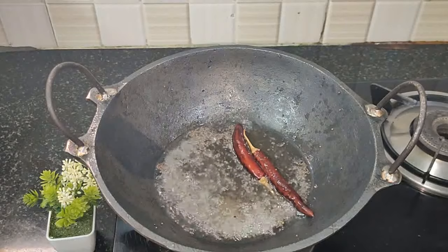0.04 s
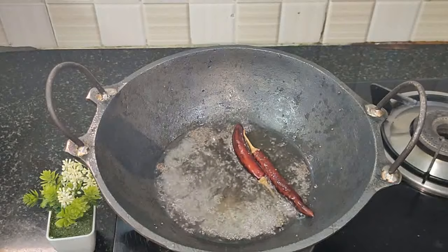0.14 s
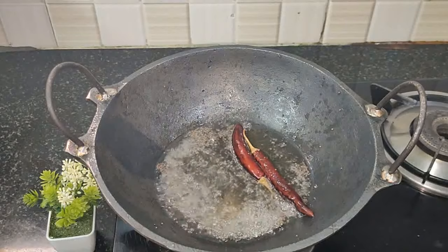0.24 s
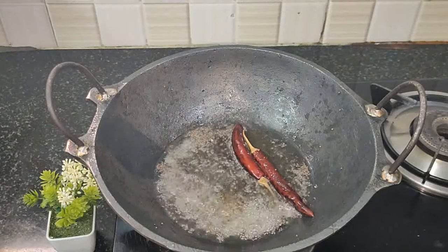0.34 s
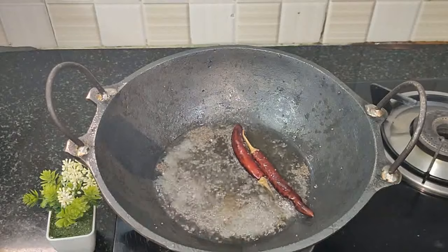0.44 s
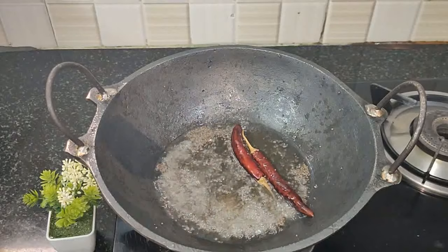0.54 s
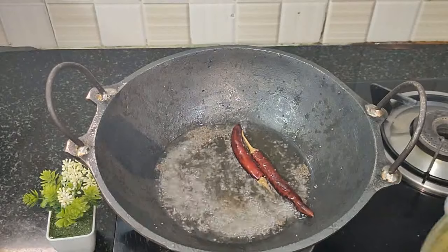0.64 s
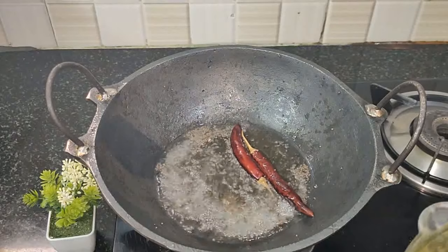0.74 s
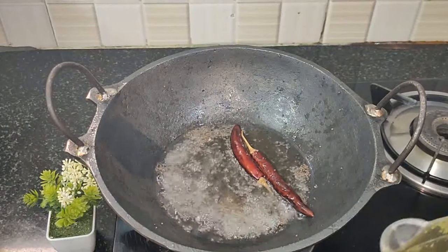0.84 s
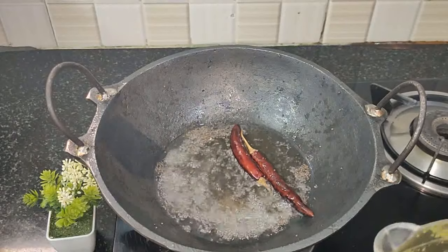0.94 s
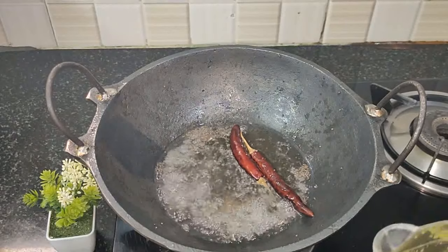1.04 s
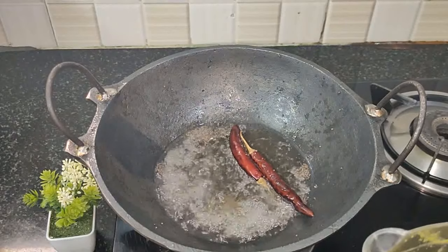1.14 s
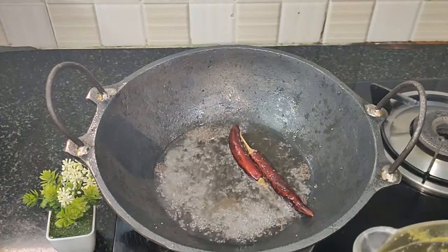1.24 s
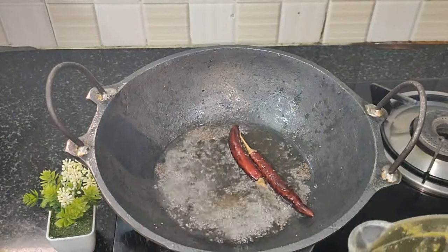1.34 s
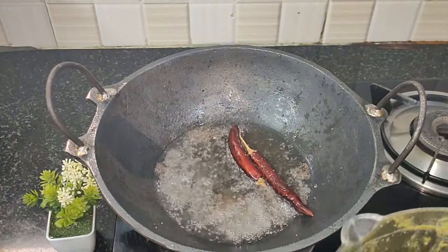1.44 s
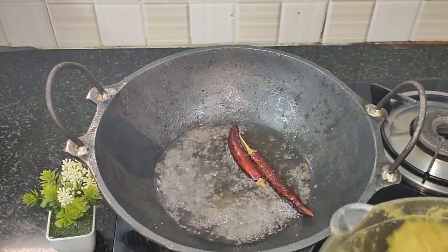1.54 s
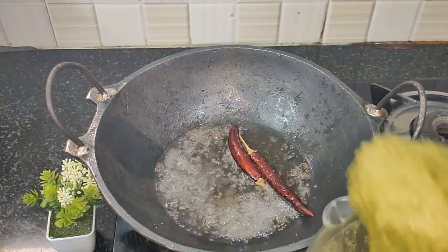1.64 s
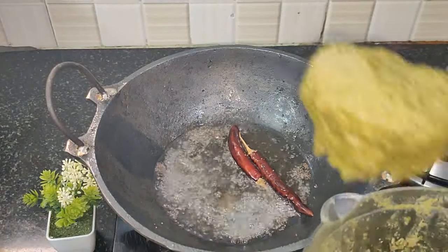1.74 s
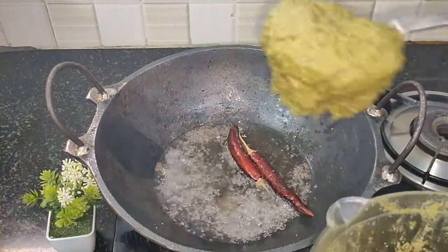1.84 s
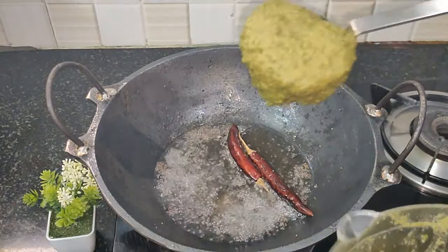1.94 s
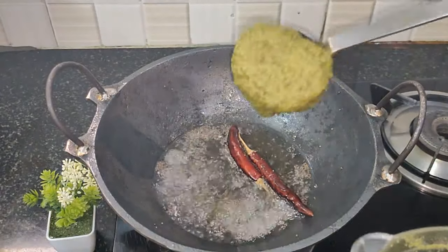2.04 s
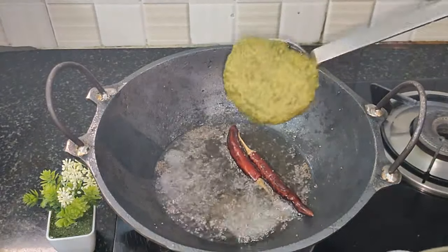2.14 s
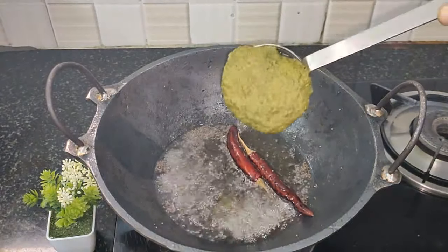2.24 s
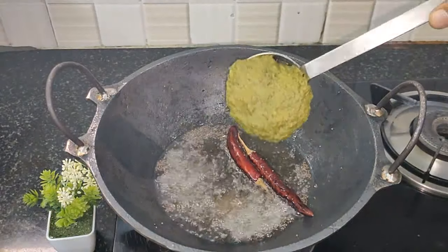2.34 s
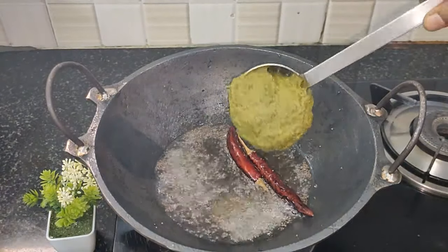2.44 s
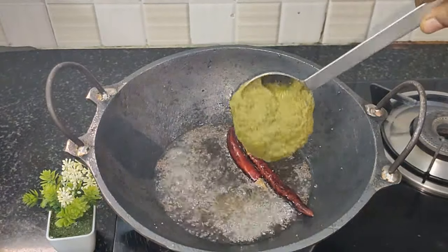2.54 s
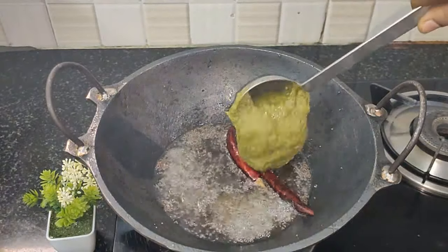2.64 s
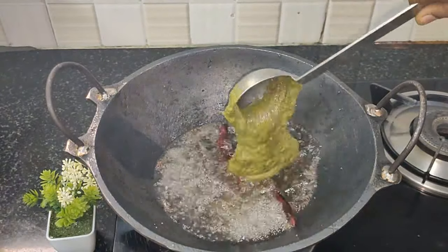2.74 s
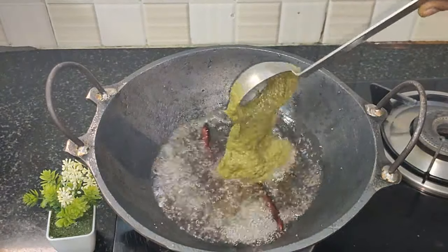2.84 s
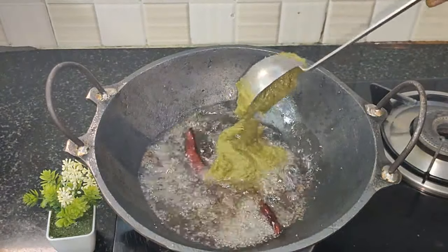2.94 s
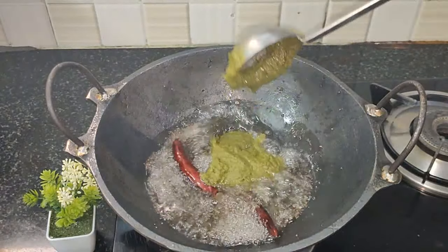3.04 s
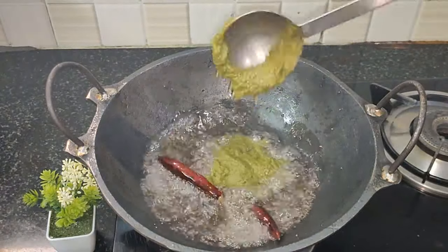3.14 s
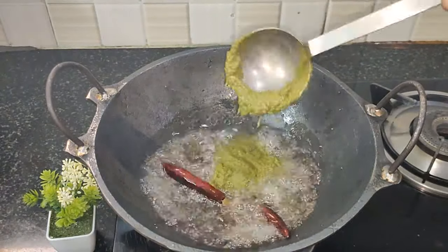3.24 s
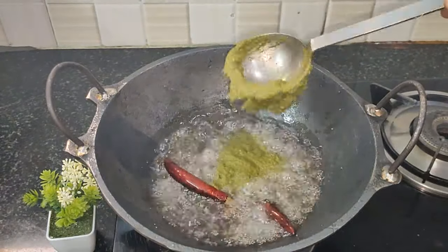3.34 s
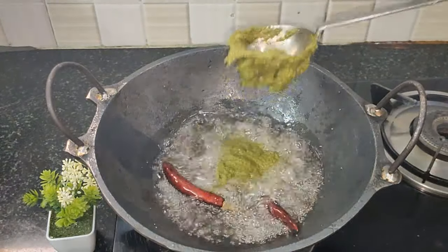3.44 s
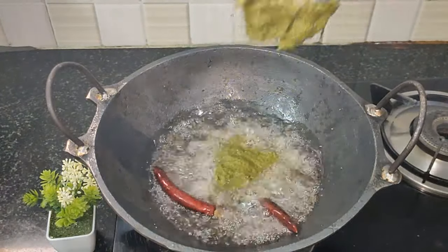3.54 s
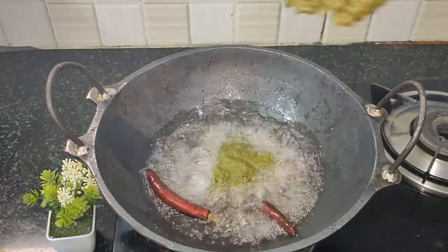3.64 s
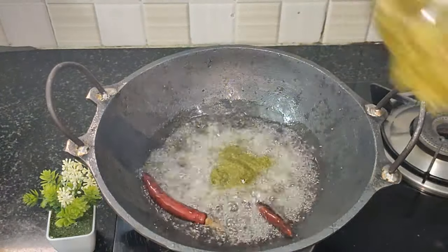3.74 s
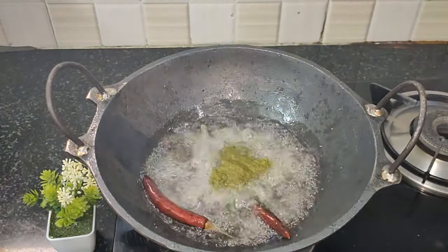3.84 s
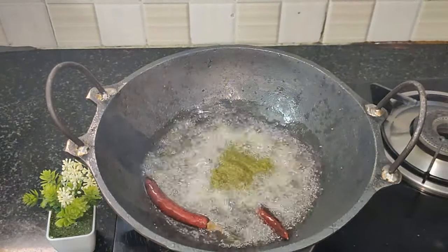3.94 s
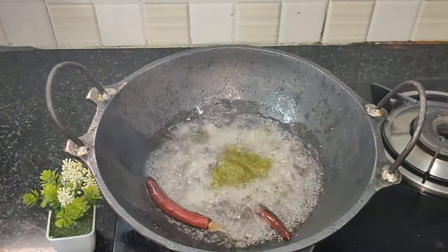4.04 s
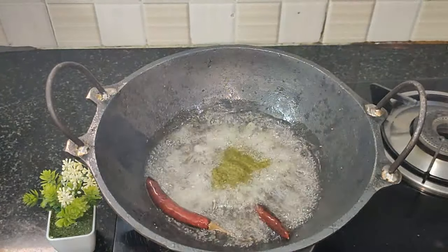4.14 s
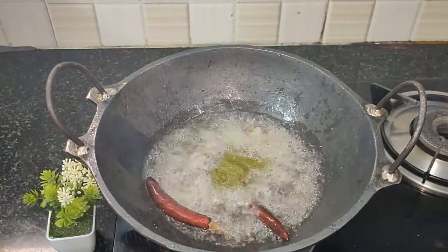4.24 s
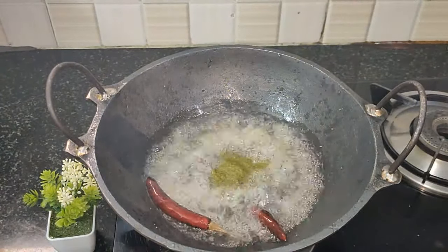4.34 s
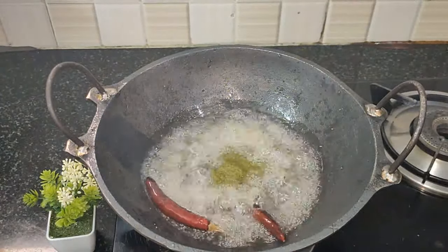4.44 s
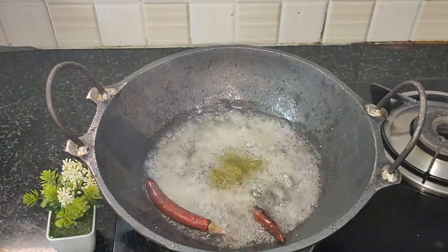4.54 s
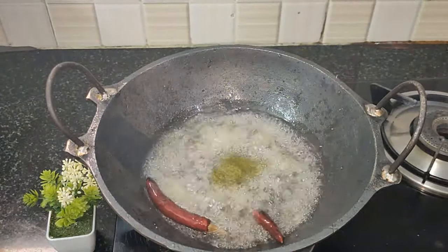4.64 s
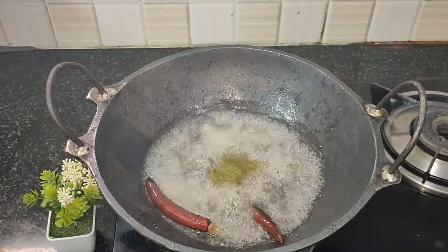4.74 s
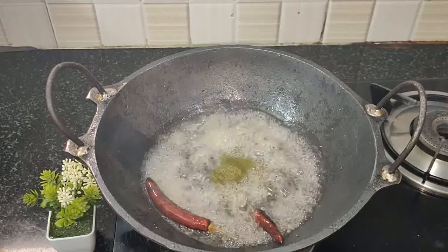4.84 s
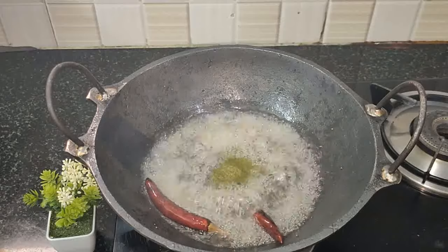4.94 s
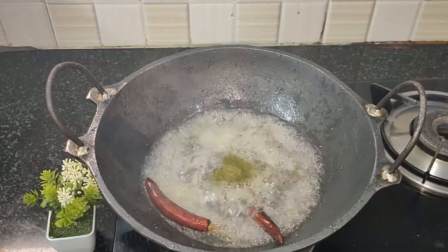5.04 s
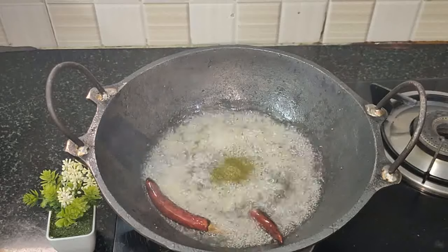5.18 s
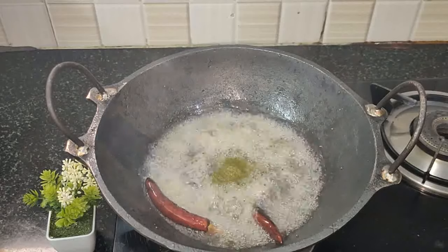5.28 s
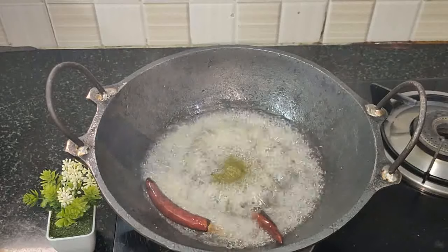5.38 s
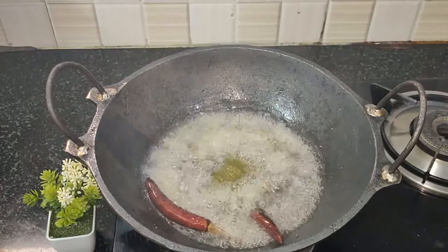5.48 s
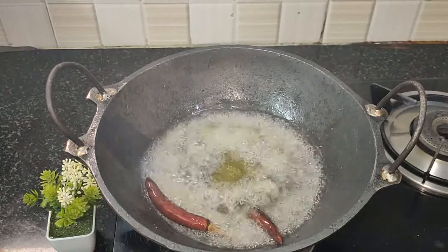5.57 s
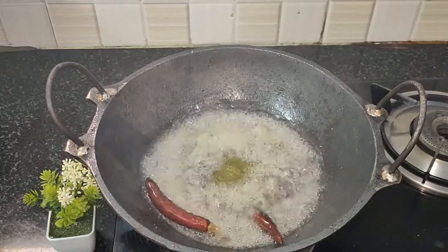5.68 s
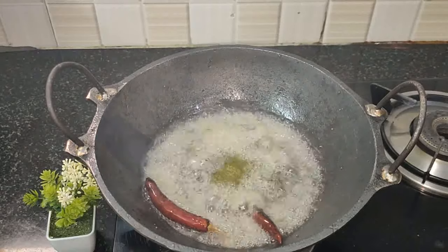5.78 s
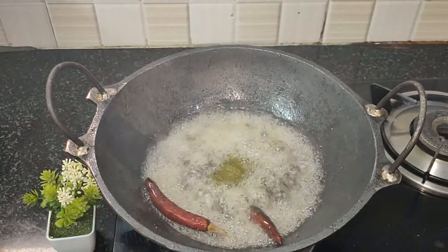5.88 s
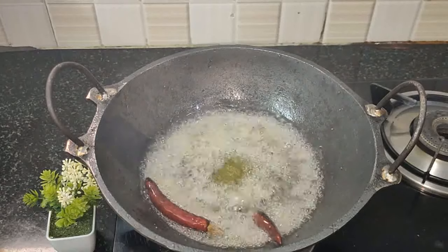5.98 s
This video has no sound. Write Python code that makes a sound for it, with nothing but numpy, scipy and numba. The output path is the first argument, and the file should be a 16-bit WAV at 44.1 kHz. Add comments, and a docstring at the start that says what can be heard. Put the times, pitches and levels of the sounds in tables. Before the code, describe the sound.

Spitting, snapping oil in an iron pan with faint knocks on the counter, then a rush of bubbling frying that grows and holds.

```python
"""Mustard seeds and wet paste in hot oil

Seeds crackle and pop in an iron pan in a small tiled kitchen; a vessel slides and knocks on the counter.
A ladle of wet paste drops into the oil, gurgles and swells into a loud, steady sizzle; a motor hums faintly.
Bubbles, pops and droplets are dying sines, coloured by the pan; the vessel is a set of struck modes;
the hum is wavering sines over filtered noise. Dense random echoes make the room."""
import sys
import numpy as np
from scipy import signal
from scipy.fft import rfft, irfft, next_fast_len
from scipy.io import wavfile
from scipy.ndimage import uniform_filter1d
from numba import njit

SR = 44100
rng = np.random.default_rng(int(sys.argv[2]) if len(sys.argv) > 2 else 0)


def digitize_waveform(pressure):
    """Quantize a signal to 16-bit integers and store it at the path in sys.argv[1].

    Rows of a 2-D input are taken as channels; values are limited to [-1, 1].
    """
    field = np.atleast_2d(pressure).T
    bounded = np.clip(field, -1, 1)
    quanta = np.round(bounded * 32767).astype(np.int16)
    wavfile.write(sys.argv[1], SR, quanta)


N = 265062
TIME = np.arange(N) / SR
FREQS = np.fft.rfftfreq(2 * next_fast_len(N // 2 + 2048), 1 / SR)
EDGE_HZ = 15850  # upper band limit
MIDDLE_HZ = 4500  # pitch reference for cracks and flares
SIMMER_DB = -40.5  # steady frying of the seeds between spits

# boiling of the paste, which lands, sinks in and foams over: t/s, level/dB
BOIL = [(2.77, -35.5), (2.81, -31.5), (3.18, -31.5), (3.26, -27), (3.73, -27), (3.77, -22.5), (6.01, -23)]
# spits, where the oil flares up and throws droplets: t/s, level/dB, decay to 1/e/s, centre f/Hz
FLARES = [(0, -33, 0.026, 7540), (.1, -30.5, 0.051, 4760), (0.289, -35.5, 0.038, 3300),
          (.34, -31, 0.042, 5850), (0.404, -33, 0.044, 4400), (.472, -38.5, .04, 3000),
          (.595, -36.5, 0.058, 4870), (0.751, -37.5, 0.09, 4400), (.952, -42, 0.037, 4800),
          (1.004, -31.5, 0.062, 4470), (1.125, -30.5, 0.024, 5300), (1.319, -30.5, 0.05, 5250),
          (1.525, -37, 0.063, 4100), (1.712, -37.5, 0.027, 2340), (1.785, -32.5, 0.035, 2660),
          (1.838, -33, 0.054, 4900), (2.145, -34, 0.066, 3340), (2.346, -36, 0.071, 5200),
          (2.445, -37, 0.043, 2600), (2.515, -34, 0.072, 3400), (2.635, -31.5, 0.028, 3800)]


def gain_of(db):
    """Decibels to amplitude."""
    return 10 ** (np.asarray(db) / 20)


def evened(x):
    """Scales to an rms of one."""
    return x / np.sqrt(np.mean(x ** 2) + 1e-20)


def read(points, hz):
    """Reads a table along a logarithmic frequency axis."""
    f, value = np.transpose(points)
    return np.interp(np.log(hz + 1), np.log(f + 1), value)


def envelope(rows):
    """Gain along a dB curve, fading quickly outside its span."""
    s, db = np.transpose(rows)
    outside_s = np.maximum(s[0] - TIME, 0) + np.maximum(TIME - s[-1], 0)
    return gain_of(np.interp(TIME, s, db)) * np.exp(-(outside_s / 0.02) ** 2)


def swell(s, half_s):
    """A smooth rise and fall of height one, down to 1/e at half_s from the top."""
    return np.exp(-((TIME - s) / half_s) ** 2)


def drift(count=70):
    """Slow chance of about unit size."""
    return np.interp(TIME, np.linspace(0, TIME[-1], count), rng.standard_normal(count))


def filtered(x, gain):
    """Applies a gain given at FREQS."""
    return irfft(rfft(x, 2 * (len(FREQS) - 1)) * gain)[..., :N]


def thinned(x, hz):
    """High-pass: small sources radiate almost no bass."""
    return signal.sosfilt(signal.butter(3, hz, "high", fs=SR, output="sos"), x)


def panned(db):
    """Left and right gains for a left-right level difference."""
    return gain_of(np.array([np.atleast_1d(db), -np.atleast_1d(db)]) / 2)


def kitchen(x, wet_db):
    """Adds the room: dense reflections of random sign, each band dying at its own rate."""
    # reverberation: f/Hz, t60/s
    t60_rows = [(200, 0.58), (1000, 0.33), (4000, 0.4), (8000, 0.22), (16000, 0.22)]
    at = np.arange(180, SR // 3, 16)
    taps = np.zeros((2, SR // 3 + 32))
    for side in taps:
        side[at + rng.integers(0, 16, len(at))] = rng.choice([-1, 1], len(at))
    hz, t, z = signal.stft(taps, SR, nperseg=256)
    z[1] += (z[0] - z[1]) / (1 + (hz[:, None] / 900) ** 2)  # long waves reach both microphones alike
    decay = gain_of(-60 * t / read(t60_rows, hz)[:, None])
    tail = signal.istft(z * decay, SR)[1]
    tail /= np.linalg.norm(tail[0])
    wet = signal.oaconvolve(np.atleast_2d(x).astype("f4"), tail.astype("f4"), axes=1)[:, :N]
    return x + gain_of(wet_db) * wet


@njit
def ring(s, size, hz, cycles, onset):
    """Sums dying sines: each swells over `onset` cycles and falls to 1/e in `cycles` cycles."""
    out = np.zeros(N)
    for k in range(len(s)):
        first = int(s[k] * SR) + 1
        turns, step = (first / SR - s[k]) * hz[k], hz[k] / SR
        pole = 2j * np.pi - 1 / cycles[k]
        z, turn = size[k] * np.exp(pole * turns), np.exp(pole * step)
        shut, opening = np.exp(-turns / onset), np.exp(-step / onset)
        for i in range(max(first, 0), min(N, first + int(6 * cycles[k] / step))):
            out[i] += z.imag * (1 - shut)
            z *= turn
            shut *= opening
    return out


def bursts(s, size, hz, cycles, pan_db, onset=0.24, spread_s=.00007, lead_s=.00004, wall=0.86):
    """Bursting bubbles at two microphones; each has its own place in the pan and echo off the pan's side."""
    place, *echo = rng.standard_normal((len(s), 3)).T
    hz, cycles = hz * np.ones(len(s)), cycles * np.ones(len(s))
    arrivals = [s.copy(), s + lead_s + spread_s * place]
    out = []
    for at, gain, path in zip(arrivals, panned(pan_db), echo):
        bounce = at + .0011 * np.exp(.4 * path)
        direct = ring(at, size * gain, hz, cycles, onset)
        out.append(direct + wall * ring(bounce, size * gain, hz, cycles, onset))
    return np.array(out)


def swarm(per_s, spread_db, cycles, clump_db, wet_db, top, count=4):
    """Countless clumped bubbles of all pitches, a few far larger; each patch of oil has its own room paths."""
    clumps = evened(uniform_filter1d(rng.standard_normal(N // 64), 14))  # about 20 ms long
    out = np.zeros((2, N))
    for _ in range(count):
        when, pitch, big, damping, side = rng.random((int(per_s * N / SR / count), 5)).T
        hz = 16500 * (.14 + .86 * pitch) ** 2
        size_db = spread_db * np.minimum(-np.log(1 - big), top)
        size_db += clump_db * clumps[(when * len(clumps)).astype(int)]
        rings = cycles * 2 ** (2 * damping - 1)
        size = gain_of(size_db) * hz ** (3 / 4) / np.sqrt(rings)  # the same power at every pitch
        out += kitchen(bursts(when * N / SR, size, hz, rings, 8 * (side - .5)), wet_db)
    return out


def frying(bubbles, colour, levels):
    """Colours a swarm by the pan and sets the levels of its middle-sized, coarse and fine bubbles."""
    # air resonances of the bowl of the pan: f/Hz, width/Hz, gain/dB
    bowl = [(336, 45, 5), (477, 16, 3), (841, 74, 5.5), (1340, 88, 2.5), (5900, 1900, 3.5),
            (15580, 1900, 11)]
    bowl_db = sum(db / (1 + (2 * (FREQS - hz) / width) ** 2) for hz, width, db in bowl)
    tone = gain_of(read(colour, FREQS) + bowl_db)
    coarse = 1 / (1 + (FREQS / 2200) ** 8)
    fine = 1 - 1 / (1 + (FREQS / 8500) ** 20)
    parts = filtered(bubbles, tone * np.array([1 - coarse - fine, coarse, fine])[:, None])
    return sum(part / part.mean(0).std() * level for part, level in zip(parts, levels))


def room_tone(waver_rad=2.35, air_level_db=-63.5):
    """A faint motor hum of sines with slowly drifting phase over the low rush of the room."""
    # motor hum: f/Hz, rms level/dB
    hum_lines = [(75.2, -88), (150.5, -72.5), (215.8, -73.5), (279.8, -74.5), (349, -74.5)]
    # still air, before the low-pass: f/Hz, gain/dB
    air_colour = [(12, -47), (20, -17), (38, -15), (75, -7), (102, -7), (139, -6), (500, -0.5), (650, -33),
                  (1100, -120)]
    noise = rng.standard_normal((3, N))
    low_pass = 1 / (1 + (FREQS / 400) ** 4)
    both = noise[:2] * 0.59 + noise[2]  # partly shared by the microphones
    air = evened(filtered(both, gain_of(read(air_colour, FREQS)) * low_pass))
    hum = np.zeros(N)
    for hz, db in hum_lines:
        phase = 2 * np.pi * hz * TIME + waver_rad * drift(count=30)
        hum += gain_of(db) * np.sqrt(2) * np.sin(phase)
    return air * gain_of(air_level_db) + hum


def vessel(slips_per_s=500):
    """Knocks and the little slips of sliding ring the same dull modes."""
    # knocks on the counter, before room and pan: t/s, peak/dB
    knock_rows = [(1.006, -24), (1.313, -27)]
    # pushes across the counter, before room and pan: t at the top/s, level/dB, half length/s
    slide_rows = [(0.086, -38.5, 0.059), (0.508, -54.5, 0.16)]
    # modes of the vessel: f/Hz, relative level/dB, t60/s
    mode_rows = [(288, -16, 0.07), (351, 0, 0.051), (566, -2, 0.019), (610, 9.5, 0.016), (670, 1, 0.016)]
    t = TIME[:SR // 8]
    modes = sum(gain_of(db - 60 * t / t60) * np.sin(2 * np.pi * hz * t) for hz, db, t60 in mode_rows)
    modes *= 1 - np.exp(-(t / 0.00073) ** 2)  # soft contact
    modes /= abs(modes).max()
    blows = np.zeros(N)
    for s, db in knock_rows:
        blows[round(s * SR)] = gain_of(db)
    slips = rng.standard_normal(N) * (rng.random(N) < slips_per_s / SR)
    push = sum(gain_of(db) * swell(s, half_s) for s, db, half_s in slide_rows)
    slide = evened(signal.oaconvolve(slips, modes)[:N]) * push
    knocks = signal.oaconvolve(blows, modes)[:N]
    return kitchen(knocks + slide, wet_db=-4.0) * panned(-6.5)


def plops(rows, cycles, trim_db, wet_db):
    """Low, quickly damped rings."""
    s, db, hz = np.transpose(rows)
    rings = bursts(s, gain_of(db + trim_db), hz, cycles, -2.2, onset=0.57, wall=0.19)
    return kitchen(thinned(rings, hz=0.8 * hz.min()), wet_db)


def gurgle(count=700, trim_db=-4):
    """Steam gurgles under the lump of paste: big, slow bubbles of nearly one pitch."""
    # steam under the lump, before trim_db: t/s, level/dB
    steam = [(2.78, -63), (3.314, -35.5), (3.7, -46)]
    when, pitch, size = rng.random((count, 3)).T
    start_s, end_s = steam[0][0], steam[-1][0]
    s = start_s + (np.arange(count) + when) / count * (end_s - start_s)
    bubbles = bursts(s, size, 440 + 80 * pitch, 5.2, -1.2)
    sound = thinned(kitchen(bubbles, wet_db=-0.5), hz=327)
    active = (TIME > s.min()) & (TIME < s.max())
    return sound / sound[:, active].std() * envelope(steam) * gain_of(trim_db)


def paste(waver_db=.5, coarse_waver_db=.8, spread_pan_db=0.14):
    """Water boils out of the paste in a dense sizzle, finer the harder it boils."""
    # colour of the sizzle: f/Hz, gain/dB
    colour = [(120, -69), (200, -14.5), (294, -29), (394, -9.5), (696, -10), (836, -11), (1040, -9.5),
              (1350, -6), (2290, -6), (5730, -1.5), (7970, -4), (9400, -12), (12800, -16), (15100, -17.5),
              (16000, -36)]
    # surges, as fresh wet paste meets the oil: t at the top/s, added level/dB, half length/s
    surges = [(2.908, 7, 0.033), (3.42, 2.5, .07), (3.63, 3.5, 0.039), (3.79, 2, 0.034),
              (4.153, 1.3, 0.058), (4.542, 1, 0.014), (4.696, 2, 0.015), (5.165, 2.5, 0.018)]
    bubbles = swarm(per_s=7000, spread_db=3.5, cycles=2.4, clump_db=0.24, wet_db=0.5, top=2.27)
    s, db = np.transpose(BOIL)
    boil_db = np.interp(TIME, s, db) - db[-1]
    heated_s = np.maximum(TIME - s[0], 0)
    surge_db = sum(added_db * swell(at, half_s) for at, added_db, half_s in surges) + waver_db * drift()
    # against the middle-sized bubbles: dB at the start + dB per dB of boiling + dB per s as it heats
    coarse_db = -12.5 - 0.2 * (boil_db + surge_db) + 0.78 * heated_s
    mist_db = -12.5 + 0.39 * (boil_db + surge_db) + 1 * heated_s
    coarse_db = coarse_db + coarse_waver_db * drift()
    sizzle = frying(bubbles, colour, [1, gain_of(coarse_db), gain_of(mist_db)])
    # the lump lands to one side, and its foam spreads to the middle
    return sizzle * envelope(BOIL) * gain_of(surge_db) * panned(spread_pan_db * boil_db)


def flaring(db_per_octave, rise_s=0.0036):
    """Level of the seeds' frying: a steady simmer, and a quick rise and slow fall at every spit."""
    power = np.full(N, gain_of(SIMMER_DB) ** 2)
    for s, db, dying_s, hz in FLARES:
        since = np.maximum(TIME - s, 0)
        top = gain_of(db + db_per_octave * np.log2(hz / MIDDLE_HZ))
        power += top ** 2 * np.minimum(since / rise_s, 1) * np.exp(-since / dying_s)
    return np.sqrt(power)


def seeds(coarse_db=-10.5, mist_db=-15):
    """Sparse, sharp crackle of seeds; a spit of lower pitch brings more coarse bubbling and less mist."""
    # colour of the crackle: f/Hz, gain/dB
    colour = [(180, -64), (300, -17), (470, -16), (656, -21), (814, -15.5), (961, -12), (1690, -11),
              (2610, -2.5), (4020, 1), (5800, 1.5), (8360, -2), (10700, -8.5), (15000, -13.5), (16000, -20)]
    bubbles = swarm(per_s=2600, spread_db=4.0, cycles=1.96, clump_db=2, wet_db=0, top=4.1, count=3)
    coarse = flaring(db_per_octave=-5) * gain_of(coarse_db)
    mist = flaring(db_per_octave=12) * gain_of(mist_db)
    return frying(bubbles, colour, [flaring(0), coarse, mist]) * panned(-3.5)


def spits(smallest_db=-6.5, spread_db=15, count=70):
    """Droplets thrown up by a spit fall back in a shower that thins out."""
    s, db, dying_s, centre_hz = np.repeat(FLARES, count, axis=0).T
    delay, pitch, big = rng.random((len(s), 3)).T
    at = s - dying_s * np.log(1 - .96 * delay)
    size = gain_of(db + smallest_db + spread_db * big ** 2)
    hz = np.minimum(centre_hz * 3.2 ** (pitch - .5), EDGE_HZ)
    droplets = bursts(at, size, hz, 2.55, -2.5, onset=0.14)
    return kitchen(thinned(droplets, hz=880), wet_db=-11)


def ticks(per_s=45, faintest_db=-27.5, range_db=9.5, growth=.45):
    """Rows of t, dB, Hz, cycles for many small random pops, which grow `growth` dB per dB of frying."""
    when, big, pitch, damping = rng.random((int(per_s * N / SR), 4)).T
    level = np.hypot(flaring(0), envelope(BOIL))[(when * N).astype(int)]
    over_simmer_db = 20 * np.log10(level) - SIMMER_DB
    db = faintest_db + range_db * big ** 2 + growth * over_simmer_db
    return np.transpose([when * N / SR, db, 4900 * 2 ** (pitch - .5), 1 + 2 * damping])


def pops(crack_hz=12000, crack_db=-10, crack_db_per_octave=22):
    """A pop is a bright crack as the skin bursts and a short ring of the cavity."""
    # loudest pops of seeds and water drops: t/s, nominal level/dB, ring f/Hz, ring length/cycles
    loud_pops = [(.109, -10.5, 3800, 1.3), (.139, -11, 4700, 1.3), (.177, -9, 4300, 1.1),
                 (.293, -9, 4400, 2), (.336, -13, 5100, 3), (.343, -11, 6500, 1.5), (.407, -5, 6000, 2.5),
                 (.471, -11, 3300, 2), (.621, -11, 5800, 4), (.769, -11.5, 4200, 4), (.947, -9, 4000, 2),
                 (1.117, -10, 3800, 2.5), (1.1415, -5.5, 5800, 2), (1.169, -12, 7200, 1.5),
                 (1.234, -12, 4700, 1.4), (1.3175, -6, 5300, 3), (1.354, -11, 6700, 1.5),
                 (1.473, -17, 5000, 5), (1.506, -10.5, 5200, 2), (1.530, -11.5, 5200, 3.5),
                 (1.612, -11, 5400, 5), (1.755, -13.5, 5300, 2), (1.831, -14, 2800, 1.5),
                 (1.843, -9, 3600, 1.2), (2.0125, -15, 4000, 3), (2.068, -11.5, 6800, 2.5),
                 (2.1375, -14, 4400, 2), (2.184, -13, 4900, 1.5), (2.315, -11, 4300, 3),
                 (2.359, -13, 5300, 3), (2.392, -8.5, 6100, 2), (2.4125, -9.5, 5800, 1.7),
                 (2.513, -10, 4000, 1), (2.623, -11, 3800, 2.5), (2.642, -11, 3700, 2),
                 (2.654, -9, 4000, 1.5), (2.7125, -16, 7500, 2), (2.752, -16, 4700, 3.5),
                 (2.767, -19, 8000, 1), (2.796, -13, 4200, 2.5), (2.948, -10, 6500, 2.5),
                 (3.031, -10, 4700, 2.5), (3.1435, -10, 5100, 3), (3.3045, -8, 3100, 1.7),
                 (3.368, -8.5, 5000, 2), (3.489, -6.5, 4000, 1.8), (4.227, -7, 6100, 2.3)]
    s, db, hz, cycles = np.vstack([loud_pops, ticks()]).T
    size = gain_of(db - 1) * (cycles + 1.3) / cycles  # makes up for quick damping
    body = bursts(s, size, hz, cycles, -1.5, onset=.3, spread_s=.00001, lead_s=.00002, wall=.3)
    # smaller bubbles ring higher and crack harder
    snap = gain_of(db + crack_db + crack_db_per_octave * np.log2(hz / MIDDLE_HZ))
    crack = bursts(s, snap, crack_hz, 0.79, -1.5, onset=0.63, spread_s=.000005, lead_s=0, wall=0.96)
    return kitchen(thinned(body + crack, hz=724), wet_db=-8.0)


def scene():
    """Everything at the stove, as the two microphones face it."""
    # large bubbles that burst with a lower plop, before trim_db: t/s, level/dB, ring f/Hz
    bubble_rows = [(.178, -14.5, 2040), (.289, -20, 900), (.412, -17.5, 1450), (1.115, -25, 1390),
                   (1.455, -26, 1560), (1.542, -21.5, 1460), (2.137, -18, 1320), (2.412, -12.5, 2800),
                   (2.443, -19.5, 1170), (2.511, -21.5, 1370), (2.557, -24, 1180), (2.689, -23.5, 1370),
                   (2.955, -14.5, 1810)]
    # soft thuds beside the stove, before trim_db: t/s, level/dB, f/Hz
    thud_rows = [(3.474, -45, 143), (4.2, -38.5, 205), (4.95, -49, 213)]
    thuds = plops(thud_rows, cycles=1.5, trim_db=-2.5, wet_db=1)
    counter = thinned(vessel(), hz=207) + thuds
    large_bubbles = plops(bubble_rows, cycles=1.64, trim_db=3, wet_db=-0.5)
    oil = seeds() + pops() + spits() + large_bubbles
    return room_tone() + counter + gurgle() + paste() + oil


def record(dry):
    """The right microphone hears more, above all in the treble; then the band limit."""
    # the two microphones: f/Hz, left-right difference/dB
    balance = [(100, -2.5), (250, -4.5), (500, -4.5), (2000, -3.5), (4000, -2), (8000, -7), (15000, -7)]
    ports = panned(read(balance, FREQS))
    heard = filtered(dry, ports / np.sqrt(np.mean(ports ** 2, axis=0)))
    low_pass = signal.firwin(511, EDGE_HZ, window=("kaiser", 9), fs=SR)
    return signal.oaconvolve(heard, low_pass[None], "same")


dry = scene()
out = record(dry)
digitize_waveform(out)
```